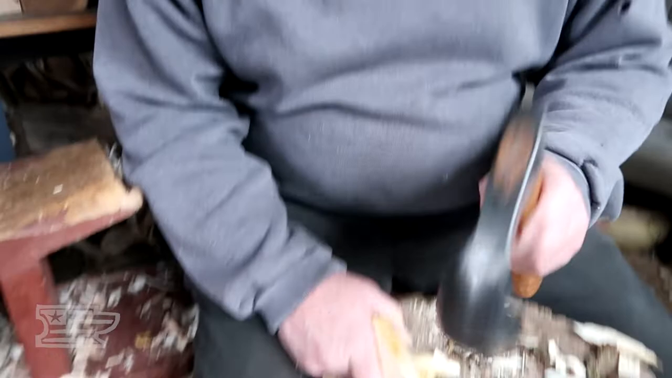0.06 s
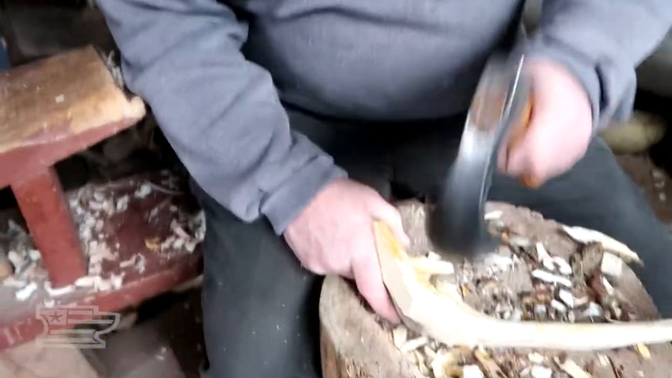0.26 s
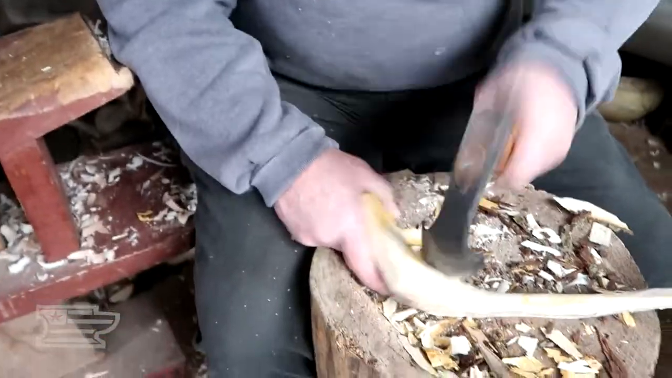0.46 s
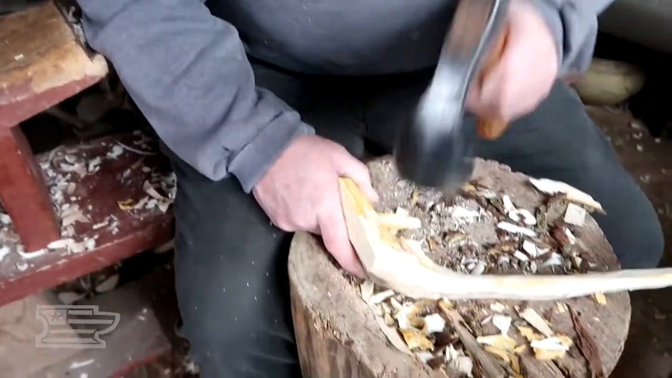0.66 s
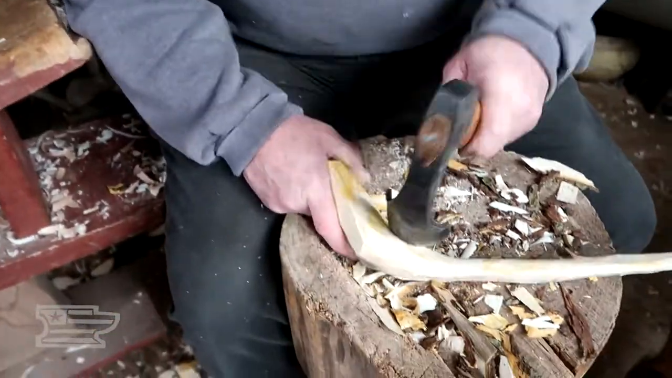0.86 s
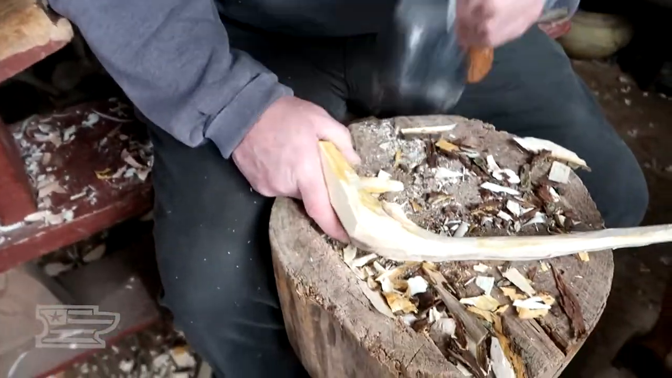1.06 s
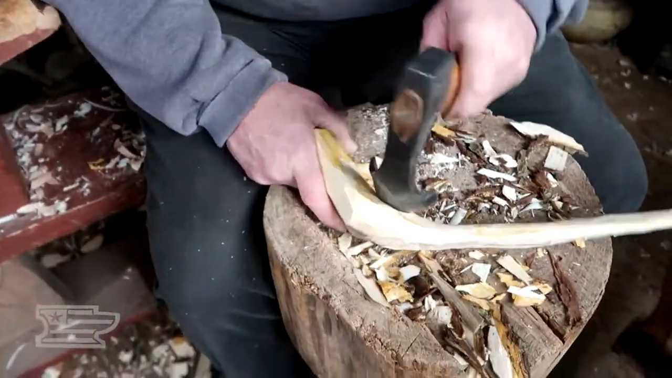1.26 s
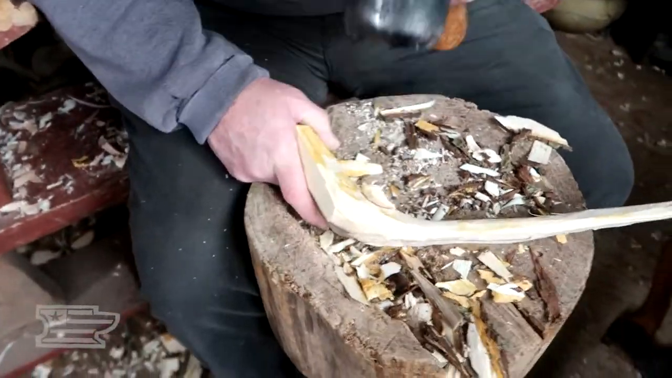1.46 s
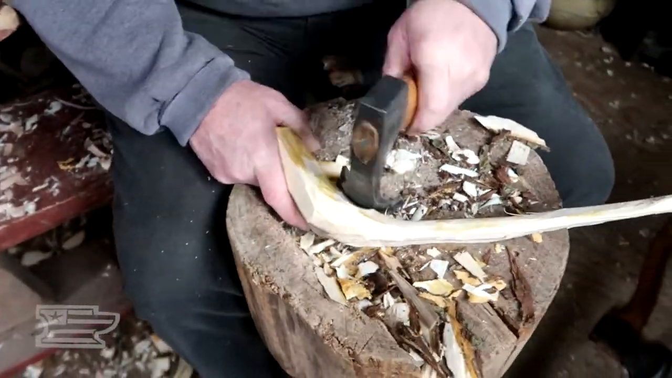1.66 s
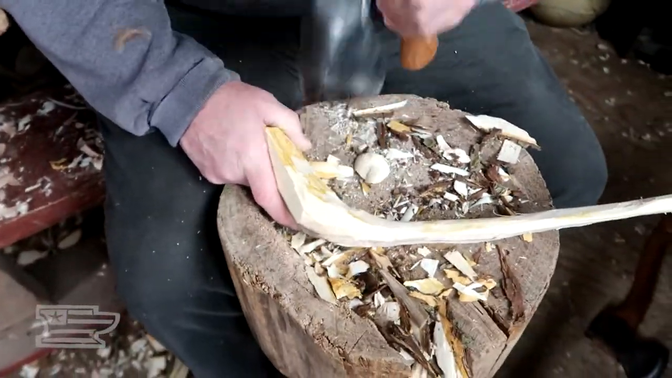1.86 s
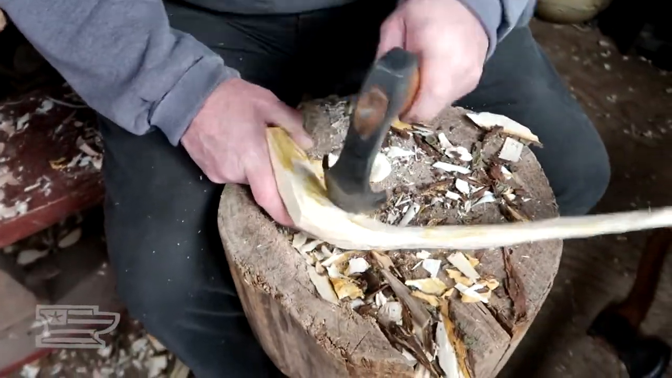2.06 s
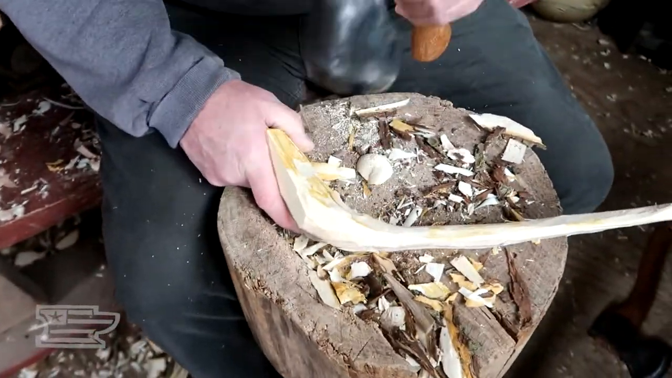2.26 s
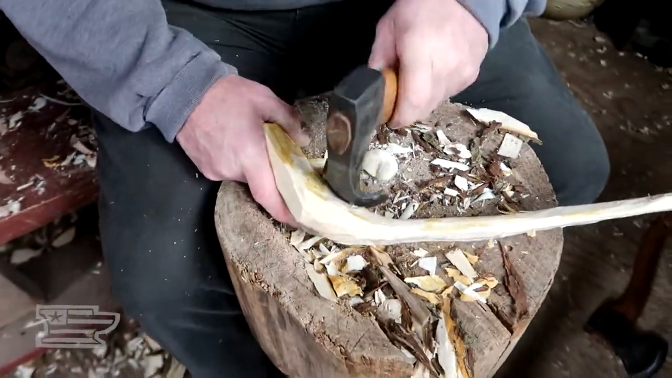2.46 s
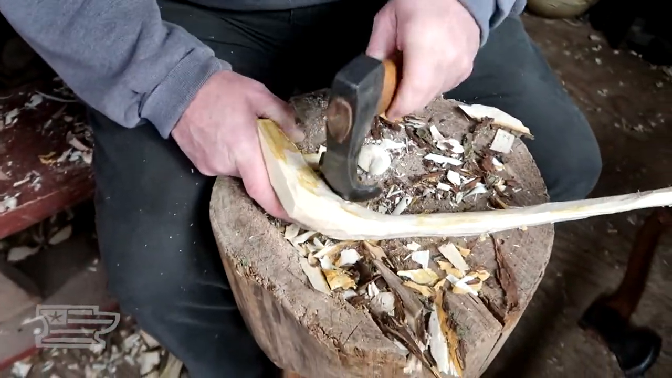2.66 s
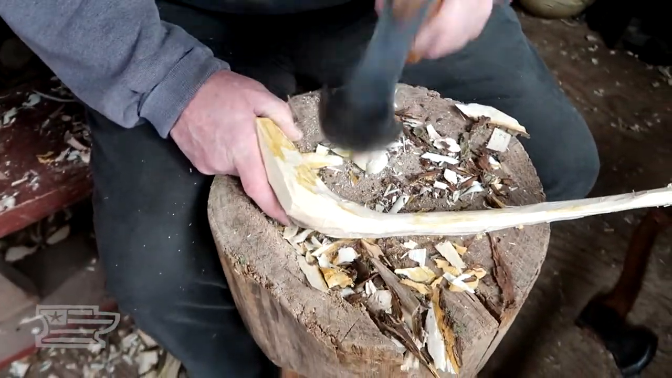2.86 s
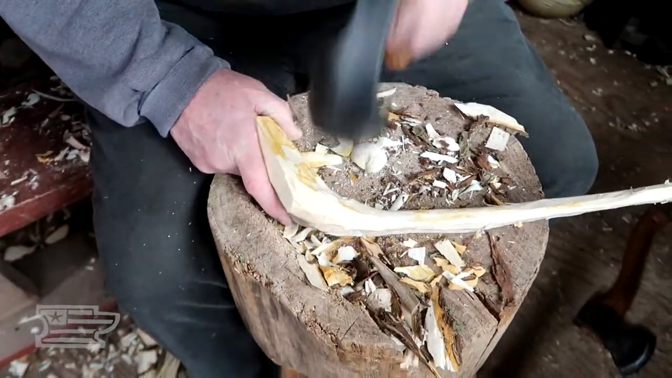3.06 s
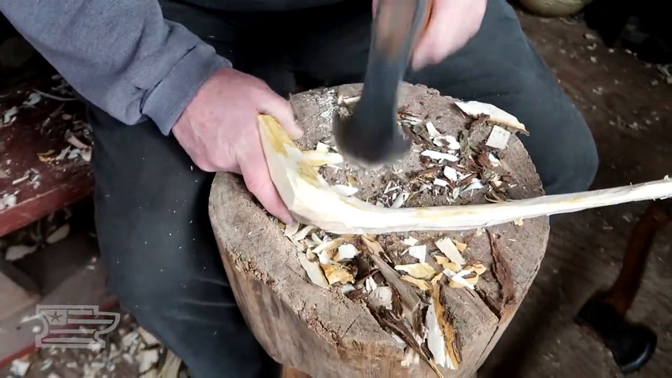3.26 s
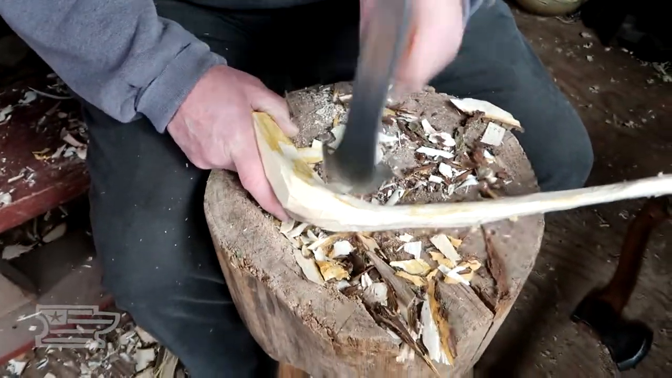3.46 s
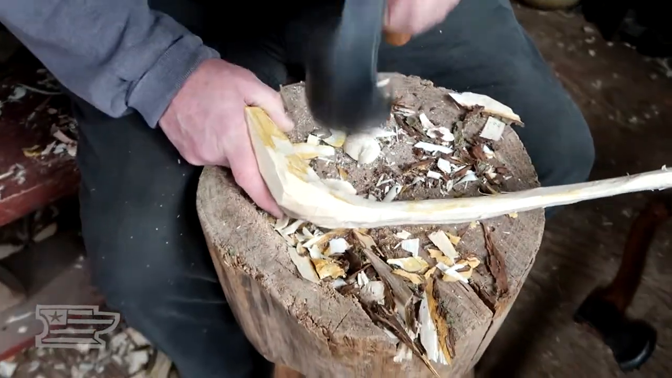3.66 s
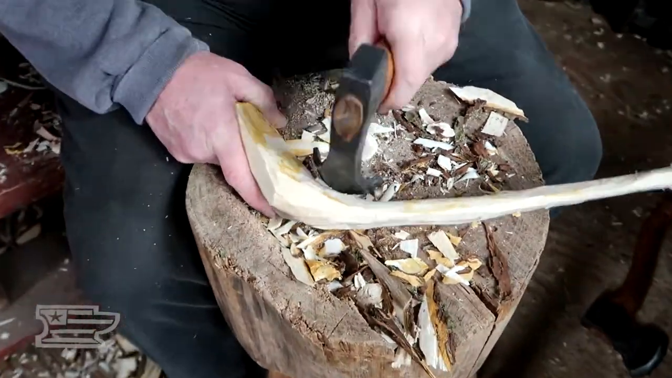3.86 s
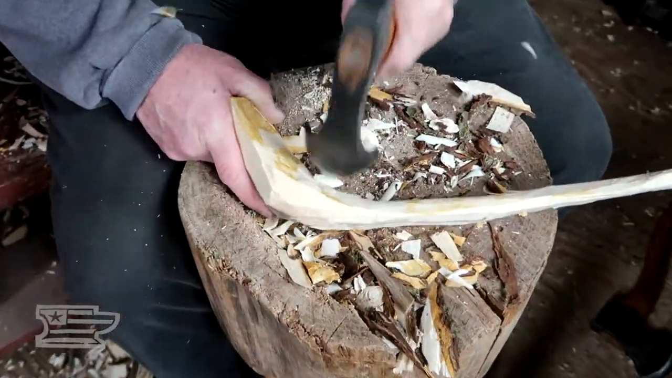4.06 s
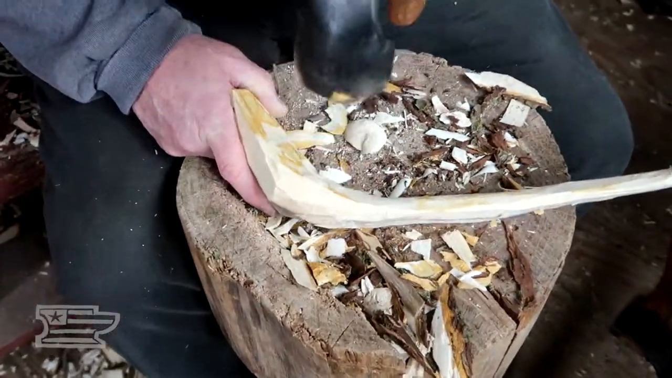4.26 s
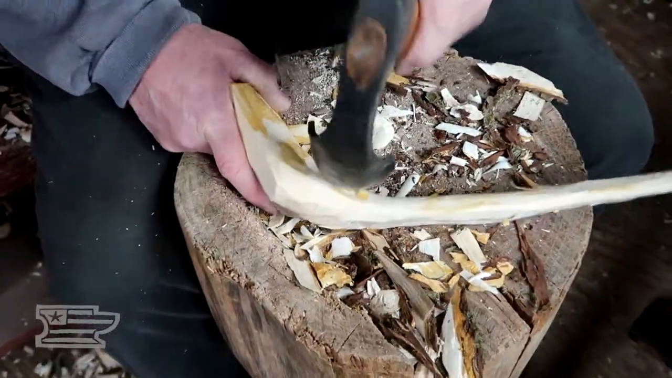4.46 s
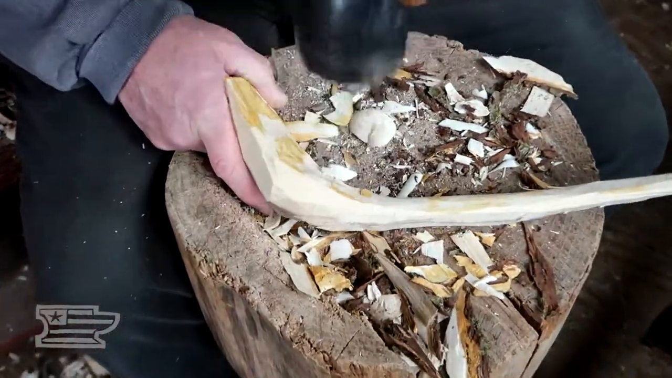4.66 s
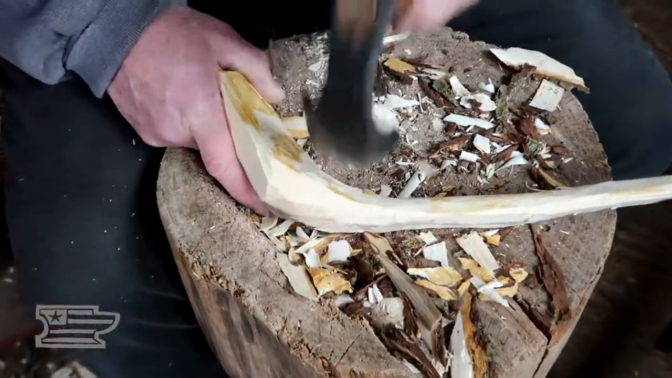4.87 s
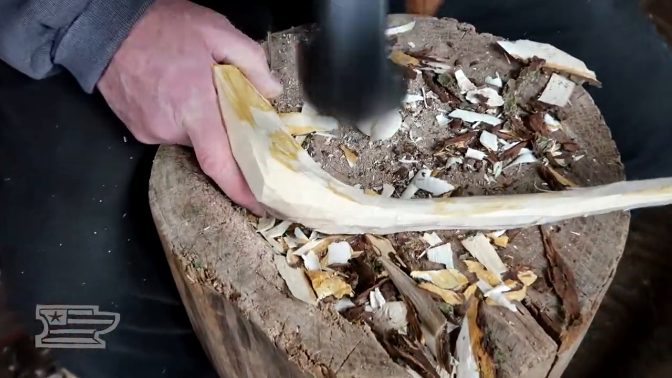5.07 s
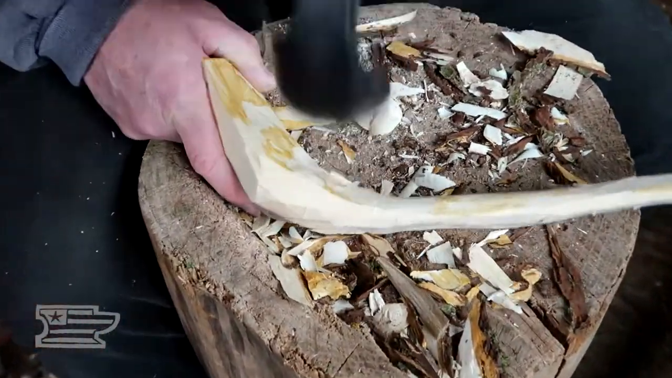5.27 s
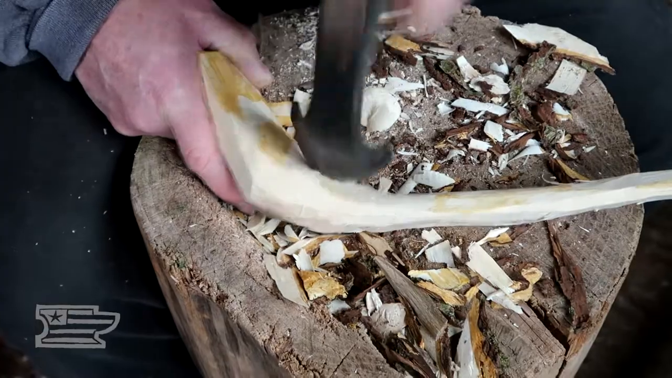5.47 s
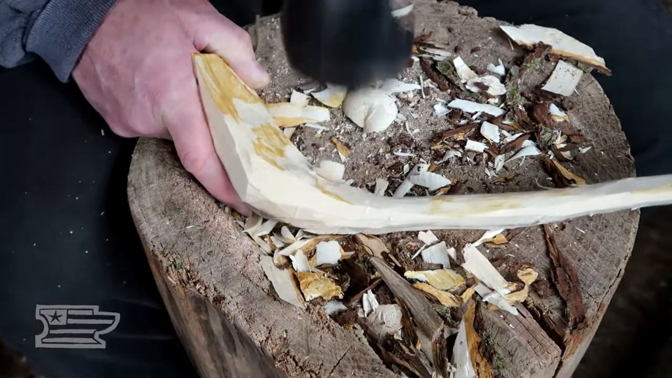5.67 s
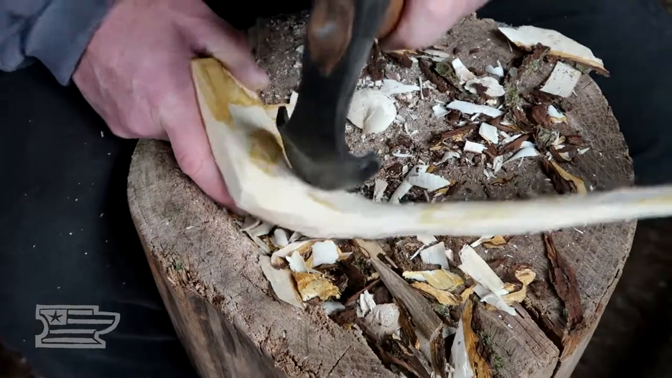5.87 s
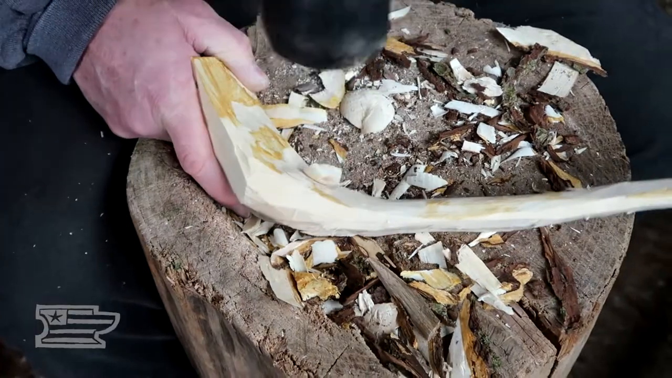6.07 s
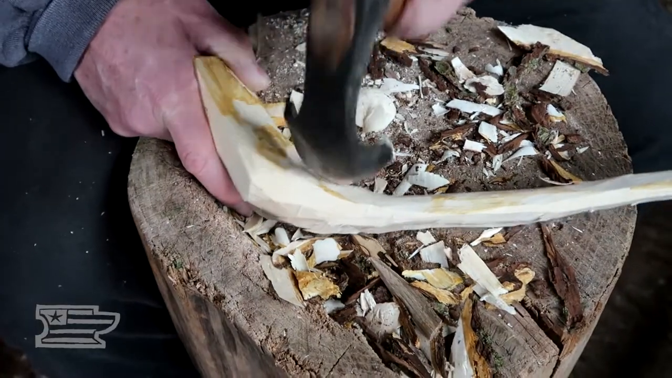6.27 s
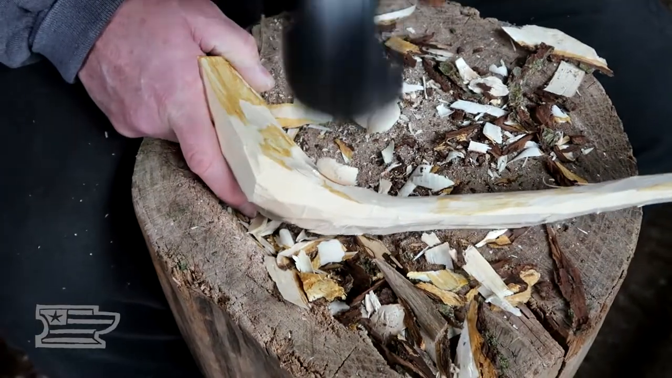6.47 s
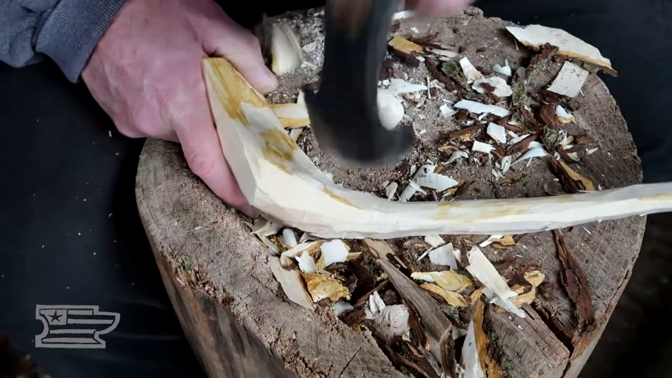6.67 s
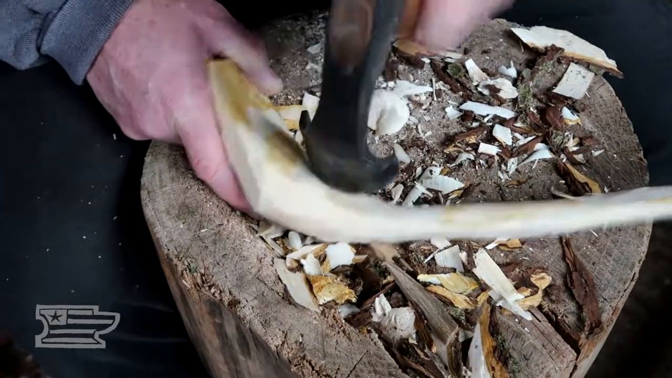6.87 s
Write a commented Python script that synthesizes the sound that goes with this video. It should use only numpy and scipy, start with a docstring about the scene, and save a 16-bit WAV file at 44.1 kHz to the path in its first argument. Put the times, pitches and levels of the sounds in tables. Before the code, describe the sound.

A hand adze chops a green branch on a stump in steady crisp crunches with low wooden thumps, close up in a small workshop.

```python
"""A hand adze chops a green branch held on a stump in a small workshop, just under three blows a second.
Clicks of snapping fibres make the crunch; jerks and pushes ring modes of branch, stump, floor and room.
Some blows slice on into the stump with a clack, and on some the steel rings as one faint fading note.
Chips tick, shifted wood scuffs, the tail of an earlier blow opens the scene; reflections follow the work.
A low rumble and a faint hiss lie behind; two close microphones differ in colour and phase."""
import sys
import numpy as np
from scipy import signal
from scipy.fft import rfft, irfft, next_fast_len
from scipy.io import wavfile

SR = 44100
rng = np.random.default_rng(int(sys.argv[2]) if len(sys.argv) > 2 else 0)


def output_pcm(signal):
    """Save a mono or channel-first signal as 16-bit PCM at the path in sys.argv[1].

    Samples are clipped to [-1, 1] before scaling.
    """
    pcm = np.clip(np.atleast_2d(signal).T, -1, 1) * 32767
    wavfile.write(sys.argv[1], SR, np.round(pcm).astype(np.int16))


N = 305613
T = np.arange(SR // 2) / SR   # the half second after a blow

# blows of the adze: start_s, bite_s (time to the deepest bite), crunch_db,
# treble_db (tilt of the crunch), thump_db (stump), chip_hz (pitch of the lifting chip)
BLOWS = [(0.1879, .004, -19.5, -3, -5.5, 2850), (0.5475, .0045, -18.5, 4.5, -7.5, 3800),
         (0.8982, 0.0046, -18, 3, -8, 4780), (1.2694, .005, -20, 3, -4, 3790),
         (1.654, 0.0049, -18.5, -1.5, -17.5, 3150), (2.0774, 0.0031, -24.5, 2.5, -7.5, 4340),
         (2.4607, 0.004, -19, 1.5, -20, 4740), (3.1905, .01, -21.5, -2.5, -19.5, 3400),
         (3.5581, 0.0043, -21.5, -0.5, -16.5, 5070), (3.9156, 0.0078, -23.5, -1, -17.5, 4550),
         (4.4553, 0.0032, -29, -1, -11.5, 4400), (4.8273, 0.0049, -31.5, 2, -22, 4570),
         (5.184, 0.0033, -30, 1.5, -12.5, 2650), (5.5472, .0065, -26, 3.5, -21.5, 4550),
         (5.893, .0065, -29.5, 2, -17, 4300), (6.245, 0.0057, -24, 1, -21, 3840),
         (6.585, 0.012, -24, 0, -18.5, 3900)]
# colour of snapping wet fibres: freq_hz, level_db
FIBRE_COLOUR = [(300, -2.5), (1000, 1), (1900, -7.5), (2400, -6), (2800, -4), (3400, 0.5), (4200, -2),
                (4800, 1.5), (5500, -11.5), (9300, -12.5), (10200, -9.5), (11200, -18.5), (14500, -16),
                (16000, -43.5)]
# colour of loose chips and grit: freq_hz, level_db
LOOSE_CHIP_COLOUR = [(200, -10.5), (800, 7.5), (2000, -3), (4500, -5.5), (7000, -13), (15000, -22.5)]


def from_db(db):
    """Decibels to gain."""
    return 10 ** (np.asarray(db) / 20)


def unit(x):
    """Scale to the energy of 10 ms at rms 1."""
    return x / np.sqrt(np.sum(x ** 2) / (SR / 100) + 1e-20)


def at_hz(rows, hz, axis=1):
    """Read a column of a table on a log-frequency axis."""
    rows = np.array(rows)
    return np.interp(np.log(np.maximum(hz, 1)), np.log(rows[:, 0]), rows[:, axis])


def add(track, s, sound):
    """Mix a sound into a track at a time in seconds."""
    start = max(round(s * SR), 0)
    track[start:start + len(sound)] += sound[:N - start]


def colour(x, spectrum, size=4096):
    """Causal (minimum-phase) filter with the given spectrum."""
    log_gain = np.log(from_db(at_hz(spectrum, np.fft.rfftfreq(size, 1 / SR))))
    cepstrum = irfft(log_gain)
    # folding the cepstrum onto positive time makes the filter minimum-phase
    cepstrum[1:size // 2] *= 2
    cepstrum[size // 2 + 1:] = 0
    impulse = irfft(np.exp(rfft(cepstrum)))
    return signal.fftconvolve(x, impulse)[:len(x)]


def ring(force, modes, detune, vary_db):
    """A force rings a set of modes; each one's tuning and share of the energy change from blow to blow."""
    hz, db, t60 = np.transpose(modes)[:, :, None]
    shift, strength = rng.standard_normal((2, len(modes), 1))   # grip and point of contact
    waves = from_db(-60 * T / t60) * np.sin(2 * np.pi * hz * (1 + detune * shift) * T)
    answers = signal.fftconvolve(force[None], waves, axes=1)[:, :len(T)]
    gains = from_db(db + vary_db * strength)
    return sum(gain * unit(answer) for gain, answer in zip(gains, answers))


def snaps(per_s, spread_db):
    """Random clicks of either sign, their sizes spread evenly over spread_db."""
    chance, size, sign = rng.random((3, len(T)))
    return (chance < per_s / SR) * from_db(spread_db * size) * np.sign(sign - .5)


def bite(peak_s, entry, fade_s):
    """Cutting force: it jumps on entry, grows with depth and dies as the blade stops."""
    entry = np.clip(entry, 0, 1)
    growing = entry + (1 - entry) * T / peak_s
    dying = np.exp(-np.maximum(T - peak_s, 0) / fade_s)
    return np.where(T < peak_s, growing, dying)


def push(centre_s, width_s):
    """A soft contact: one rounded pulse of force."""
    return np.exp(-.5 * ((T - centre_s) / width_s) ** 2)


def chops():
    """Each blow is crunch and knock first, then the stump's answer; a harder thump brings more knock and rocking."""
    usual_thump_db = -16
    knock_usual_db, knock_growth = -26.5, 0.45   # at the usual thump; dB per dB of thump
    rock_usual_db, rock_growth = -27.5, 1.26   # likewise
    out = np.zeros(N)
    for start_s, bite_s, crunch_db, treble_db, thump_db, chip_hz in BLOWS:
        harder_db = thump_db - usual_thump_db
        knock_db = knock_usual_db + knock_growth * harder_db
        rock_db = rock_usual_db + rock_growth * harder_db
        cut = from_db(crunch_db) * crunch(bite_s, treble_db, chip_hz)
        add(out, start_s, cut + from_db(knock_db) * knock(bite_s))
        add(out, start_s, from_db(thump_db) * thump() + from_db(rock_db) * rocking())
    return out


def crunch(bite_s, treble_db, chip_hz, chip_db=4, fade=0.68):
    """Fibres snap at thousands a second; the finest give the treble, and the lifting chip resonates."""
    fibres = snaps(per_s=7000, spread_db=9.5) * bite(bite_s, entry=0.32, fade_s=fade * bite_s)
    resonance = [(chip_hz * .84, 0), (chip_hz, chip_db), (chip_hz * 1.16, 0), (7000, treble_db - 0.5)]
    return unit(colour(colour(fibres, resonance), FIBRE_COLOUR))


def knock(bite_s):
    """The blade advances in jerks that ring the damp branch."""
    # modes of the branch: freq_hz, level_db, t60_s
    branch_modes = [(460, -6, 0.036), (672, 2.5, 0.016), (860, -9.5, 0.014), (1016, 2.5, 0.02),
                    (1325, -3, 0.034), (1495, -13, 0.027), (2101, -6.5, 0.018), (2650, -7.5, 0.022)]
    jerks = snaps(per_s=6800, spread_db=21.0) * bite(bite_s * 0.89, entry=0.74, fade_s=0.005)
    return unit(ring(jerks, branch_modes, detune=0.016, vary_db=3))


def thump():
    """The swing's momentum presses the stump into the floor, rings the low modes and shakes the litter on top."""
    # low modes of stump, floor and room: freq_hz, level_db, t60_s
    low_modes = [(55.4, -2, 0.34), (78, -2.5, 0.13), (99.36, -9, 0.55), (122.1, -6, 0.12),
                 (167.6, -15, 0.44)]
    force = push(centre_s=.012, width_s=.0018)
    return jostle() - unit(ring(force, low_modes, detune=0.01, vary_db=2.73))


def jostle(level_db=-32, settle_s=0.024, hop_s=0.027):
    """Loose chips hop when the stump is struck and patter back down."""
    landings = snaps(per_s=3000, spread_db=15.5) * np.minimum(T / hop_s, 1) * np.exp(-T / settle_s)
    return from_db(level_db) * unit(colour(landings, LOOSE_CHIP_COLOUR))


def rocking():
    """The stump's uneven foot bumps the floor twice after the blow."""
    # modes of the stump's foot: freq_hz, level_db, t60_s
    foot_modes = [(176.7, -1.5, 0.19), (257, 1, 0.039), (305, -5.5, 0.079), (312.7, -5, 0.093),
                  (393, -2.5, 0.039), (641, -11.5, 0.089)]
    first_s, second_s = rng.normal(0, 0.0013, 2)   # uneven timing
    bumps = push(0.013955 + first_s, width_s=0.00023) + 0.61 * push(.039 + second_s, width_s=0.00057)
    return unit(ring(bumps, foot_modes, detune=0.048, vary_db=2.0))


def follow_through(slice_s=.013, rocking_db=-6):
    """The edge peels a shaving and stops in the end grain with a dull clack; the stump takes the rest of the swing."""
    # the blade stops in the stump: clack_s, clack_db
    stops = [(1.68, -21.5), (2.477, -16.5), (3.9409, -18), (4.846, -18.5), (6.613, -24)]
    # colour of the clack: freq_hz, level_db
    clack_colour = [(60, -13.5), (300, -0.5), (480, -2), (640, -0.5), (800, -4), (1000, -3.5), (1330, -4),
                    (1900, -14), (3000, -18.5), (4500, -17.5), (5600, -40), (15000, -79)]
    shaving_db, second_thump_db = -15, 7   # against the clack
    out = np.zeros(N)
    for clack_s, clack_db in stops:
        shaving = snaps(per_s=20000, spread_db=17.0) * bite(slice_s, entry=0.27, fade_s=0.0014)
        shaving = unit(colour(shaving, FIBRE_COLOUR))
        add(out, clack_s - slice_s, from_db(clack_db + shaving_db) * shaving)
        clack = snaps(per_s=6000, spread_db=9.0) * bite(0.001, entry=0.99, fade_s=0.0026)
        add(out, clack_s, from_db(clack_db) * unit(colour(clack, clack_colour)))
        answer = thump() + from_db(rocking_db) * rocking()
        # 4 ms early: the blade is already pressing
        add(out, clack_s - .004, from_db(clack_db + second_thump_db) * answer)
    return out


def steel(pitch_hz=4533, t60=1.9):
    """The adze head sings on one thin, fading note."""
    # blows that set the head ringing: start_s, level_db
    rings = [(0.192, -61), (2.08, -68), (4.458, -66.5), (4.831, -66.5), (5.889, -63), (6.589, -65.5)]
    out, t = np.zeros(N), np.arange(2 * SR) / SR
    for start_s, level_db in rings:
        add(out, start_s, from_db(level_db - 60 * t / t60) * np.sin(2 * np.pi * pitch_hz * t))
    return out


def litter(crest_db=12.5):
    """Chips tick as they land; soft grit gives the tail of an earlier blow, then wood scuffing over the litter."""
    # falling chips: start_s, peak_db (nominal: crest_db is taken off for the 10 ms level)
    falls = [(0.2997, -31.5), (2.636, -40), (2.8419, -43), (4.0732, -34), (4.7223, -39), (5.6117, -32.5),
             (5.7226, -50), (6.0596, -40.5), (6.7792, -50)]
    # first row the fading tail of a blow struck just before the start, the others wood scuffs:
    # start_s, length_s, level_db (rms before the envelope)
    tail_and_scuffs = [(0, 0.053, -53), (0.245, 0.2, -47.5), (1.97, 0.015, -50), (2.001, 0.074, -51.5),
                       (3.388, 0.086, -62)]
    out = np.zeros(N)
    for start_s, peak_db in falls:
        tick = snaps(per_s=57000, spread_db=18.0) * np.exp(-T / 0.0029)   # a click on every sample
        add(out, start_s, from_db(peak_db - crest_db) * unit(colour(tick, LOOSE_CHIP_COLOUR)))
    for start_s, length_s, level_db in tail_and_scuffs:
        grit = colour(snaps(per_s=3900, spread_db=11), LOOSE_CHIP_COLOUR)
        envelope = np.sin(np.pi * np.minimum(T / length_s, 1))
        add(out, start_s, from_db(level_db) * grit / grit.std() * envelope)
    return out


def workshop(x, count=5):
    """Arms and body keep moving, so the pattern of reflections changes from blow to blow, cycling through a few."""
    starts = np.array(BLOWS)[:, 0] - .03   # change just ahead of each blow
    pose = np.searchsorted(starts, np.arange(N) / SR) % count
    mid, side = sum(signal.oaconvolve([x * (pose == k)], room_response(), axes=1)[:, :N]
                    for k in range(count))
    return np.array([mid + side, mid - side])


def room_response(early=2.3, early_s=0.01, gap_s=0.0026):
    """Close reflections off floor and bench, then a short tail that dies sooner in the treble; mid and side."""
    # the room: freq_hz, t60_s, wet_db (reverberation against direct sound), side_db (side against mid)
    room = [(51.34, 0.94, -19.5, 4.5), (109, 0.62, -8, 3.5), (296.8, 0.53, -4.5, -8.5),
            (694, 0.52, -6.5, -6.5), (1454, 0.35, -4.5, -6), (2460, 0.4, -4.5, -4.5),
            (4000, 0.4, -12.5, -5.5), (7000, 0.3, -5, -2), (15000, .2, -14.5, 0.5)]
    white = rng.standard_normal((2, 2, len(T)))
    edges = np.geomspace(30, 17000, 19)   # band edges, Hz
    build_up = (1 + early * np.exp(-T / early_s)) * np.clip(T / gap_s - 1, 0, 1)
    response = 0
    for k, (low, high) in enumerate(zip(edges, edges[1:])):
        centre_hz = np.sqrt(low * high)
        t60, wet_db, side_db = (at_hz(room, centre_hz, axis=column) for column in (1, 2, 3))
        band_filter = signal.butter(2, [low, high], "band", fs=SR, output="sos")
        band = signal.sosfilt(band_filter, white[k % 2])
        band = band * build_up * from_db(-60 * T / t60)
        share = 2 * (high - low) / SR   # the band's part of a click's energy
        band = band * np.sqrt(share / np.sum(band ** 2, 1, keepdims=True))
        response = response + band * from_db([[wet_db], [wet_db + side_db]])
    return response


def background(rumble_db=-45.5, hiss_db=-61, width=0.41):
    """Low rumble of the building and a faint hiss, as coloured noise; both sink once and stay lower."""
    # colour of the rumble: freq_hz, level_db
    rumble_colour = [(20, -7), (50, -2), (105, 1.5), (150, -10), (320, -12), (480, -16.5), (700, -18),
                     (950, -30), (2000, -33), (5000, -41), (15500, -69)]
    # colour of the hiss: freq_hz, level_db
    hiss_colour = [(300, 20.5), (750, 8.5), (950, 11), (1220, 25.5), (1600, 11), (3000, 6.5), (5000, 0),
                   (7000, 2), (15500, -3)]
    # the sinking falls in a pause between blows
    sink_start_s, sink_length_s, sink_db = 2.68, 0.43, 8.5
    sunk = np.clip((np.arange(N) / SR - sink_start_s) / sink_length_s, 0, 1)
    out = 0
    for spectrum, level_db in ((rumble_colour, rumble_db), (hiss_colour, hiss_db)):
        # the first second is dropped while the filter settles
        noise = np.array([colour(white, spectrum)[SR:] for white in rng.standard_normal((2, N + SR))])
        out = out + from_db(level_db - sink_db * sunk) * noise / noise.std()
    mid, side = out
    return mid + width * side * np.array([[1], [-1]])


def scene():
    """The work close by and direct, its reflections in the workshop, and the background."""
    work = chops() + follow_through() + steel() + litter()
    return work + workshop(work) + background()


def record(dry):
    """The two microphones differ in colour and phase; the deepest bass and the top are cut."""
    # left microphone against right: freq_hz, level_db, phase_lead_rad
    ports = [(80, .5, 0), (130, 2, 0), (900, 1.8, 0), (2800, 1.5, -.35), (4500, 1.2, -.1), (5400, 3.7, -.3),
             (7300, 3.5, -1.15), (8300, -3, -1.1), (10000, -2.8, .3), (11000, 4, .4), (12000, 4, -.6),
             (15500, 5, -1)]
    size = next_fast_len(N + SR // 10)
    hz = np.fft.rfftfreq(size, 1 / SR)
    half = np.array([[.5], [-.5]])   # each microphone takes half the difference
    gains = from_db(half * at_hz(ports, hz)) * np.exp(1j * half * at_hz(ports, hz, axis=2))
    pair = irfft(rfft(dry, size) * gains, size)[:, :N]
    pair = signal.sosfilt(signal.butter(3, 36, "high", fs=SR, output="sos"), pair)
    return signal.sosfilt(signal.ellip(10, .1, 80, 15800, fs=SR, output="sos"), pair)


dry = scene()
out = record(dry)
output_pcm(out)
```